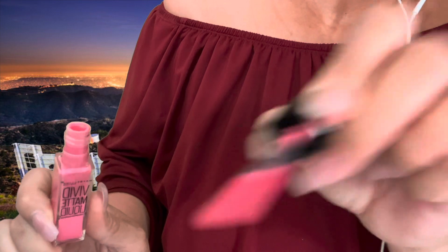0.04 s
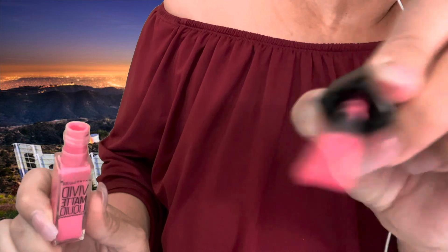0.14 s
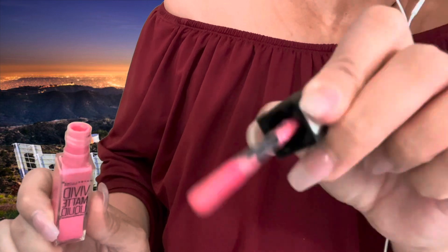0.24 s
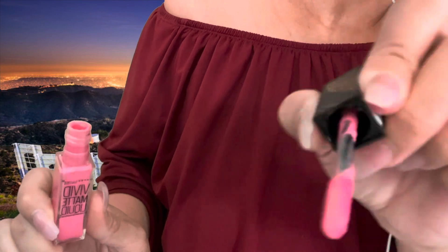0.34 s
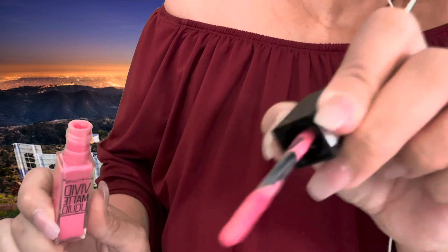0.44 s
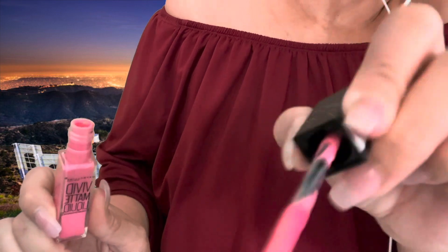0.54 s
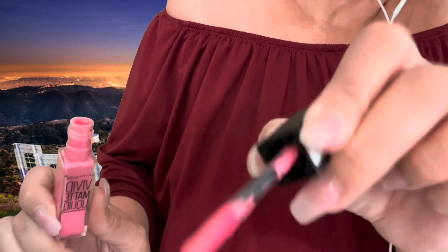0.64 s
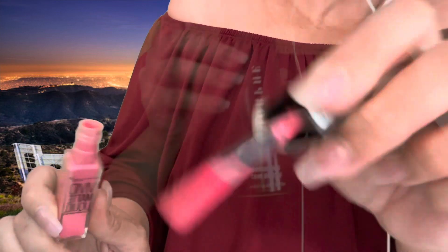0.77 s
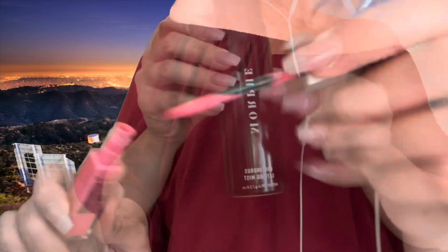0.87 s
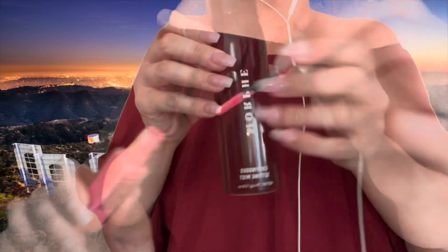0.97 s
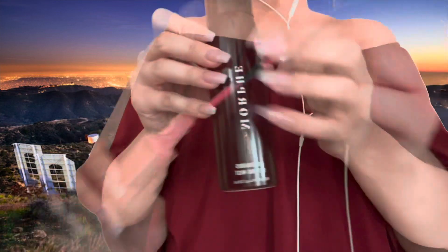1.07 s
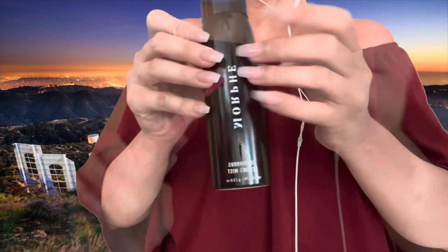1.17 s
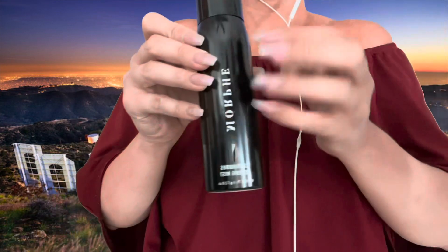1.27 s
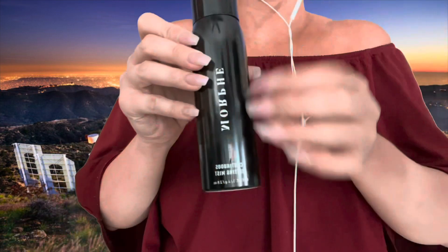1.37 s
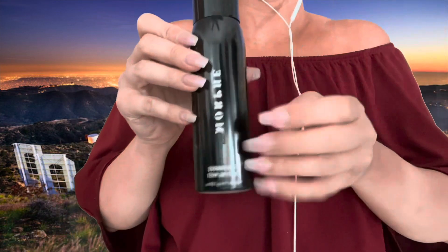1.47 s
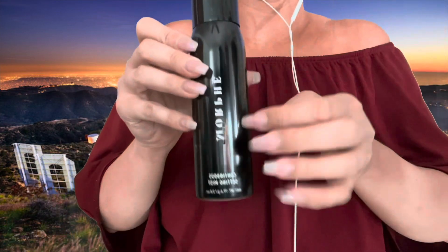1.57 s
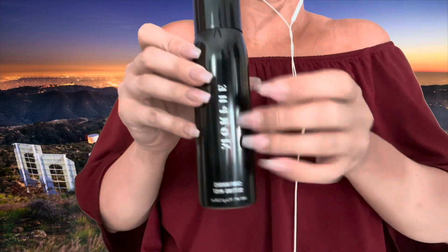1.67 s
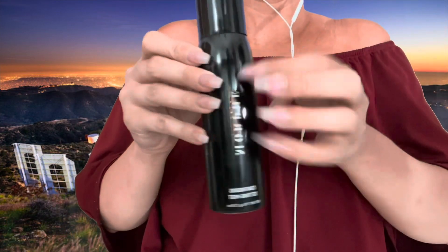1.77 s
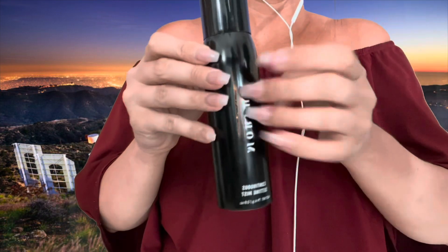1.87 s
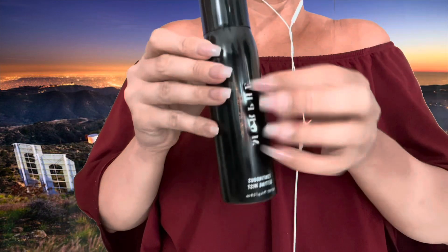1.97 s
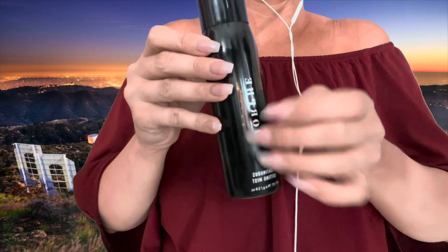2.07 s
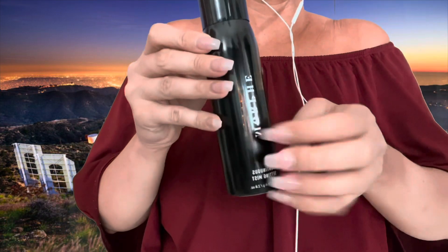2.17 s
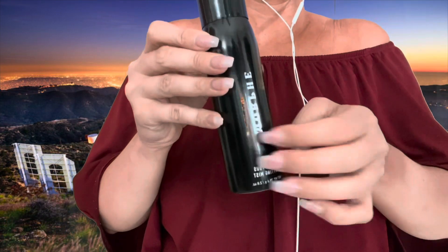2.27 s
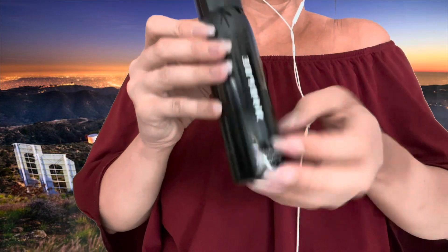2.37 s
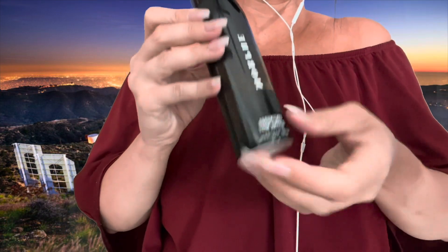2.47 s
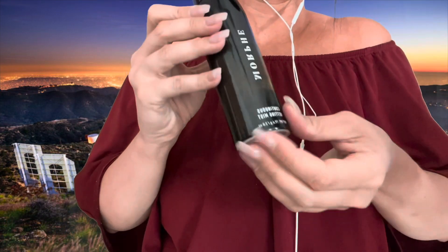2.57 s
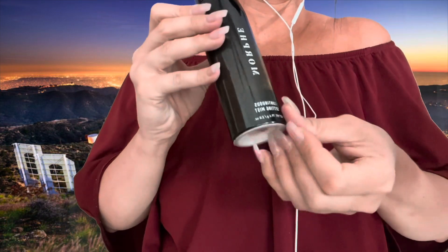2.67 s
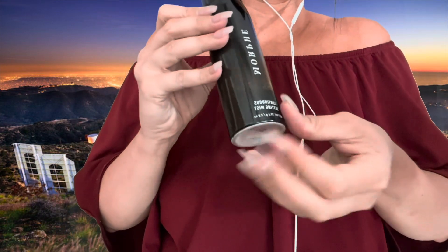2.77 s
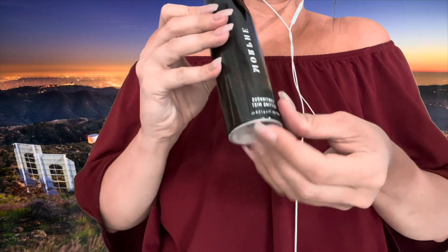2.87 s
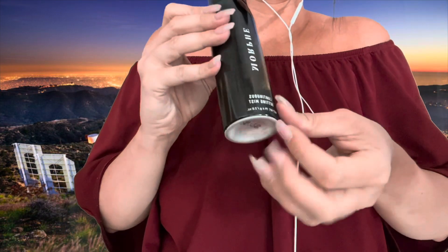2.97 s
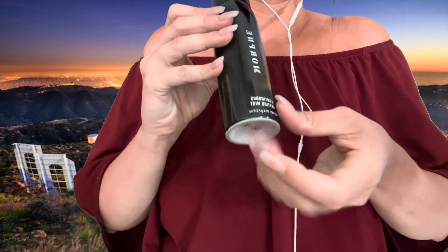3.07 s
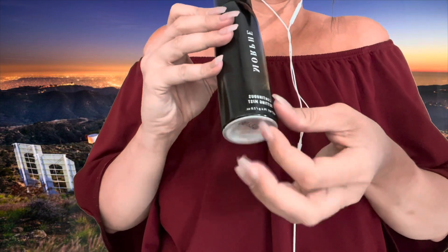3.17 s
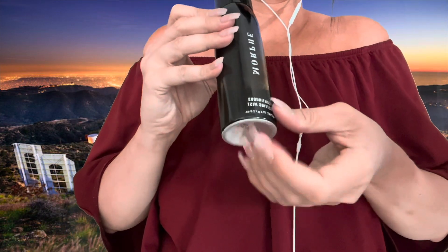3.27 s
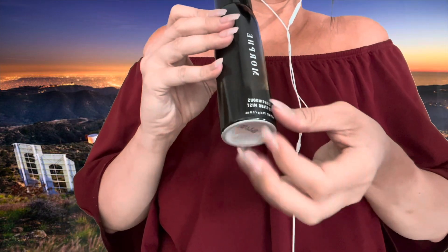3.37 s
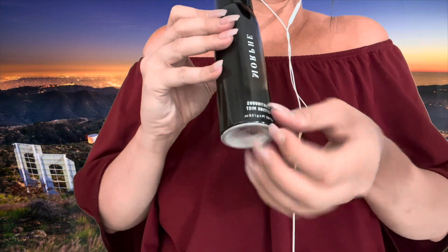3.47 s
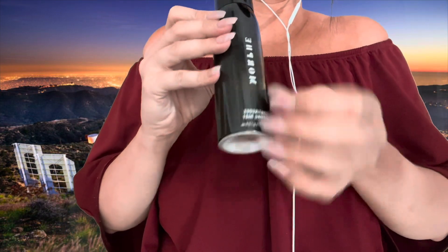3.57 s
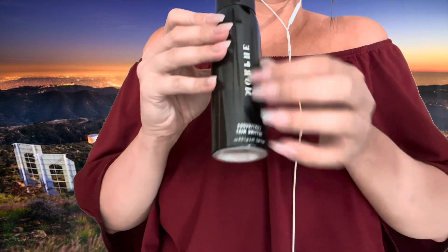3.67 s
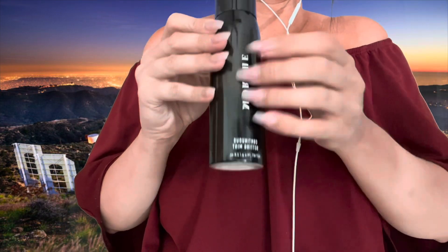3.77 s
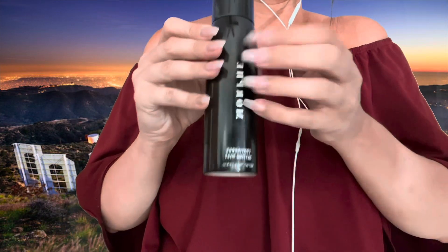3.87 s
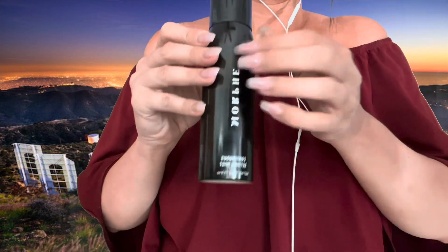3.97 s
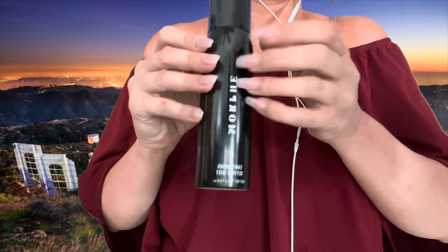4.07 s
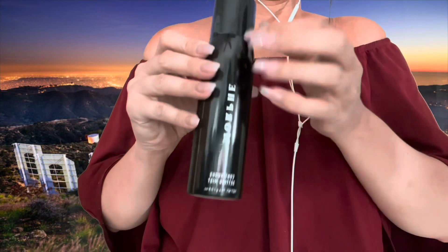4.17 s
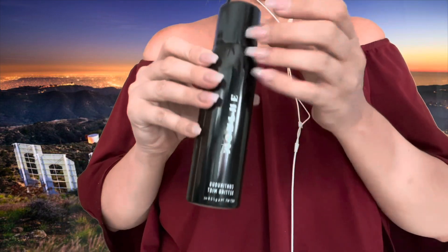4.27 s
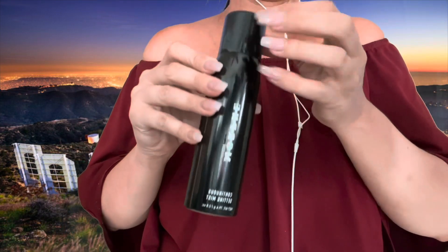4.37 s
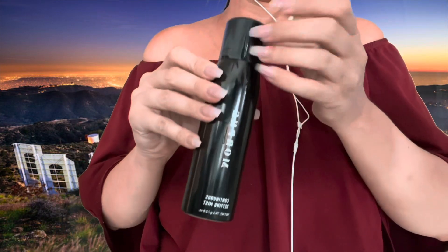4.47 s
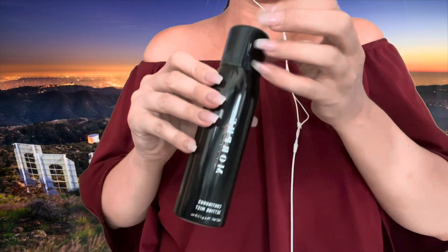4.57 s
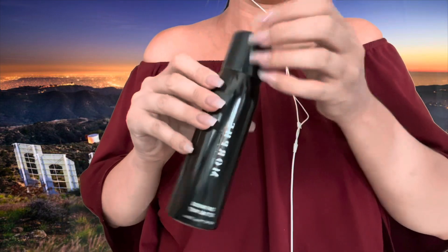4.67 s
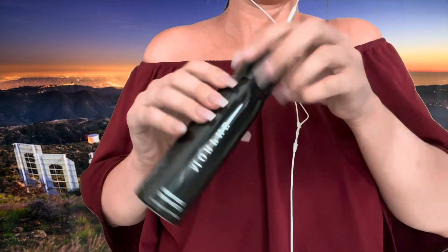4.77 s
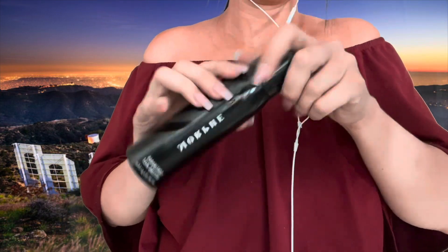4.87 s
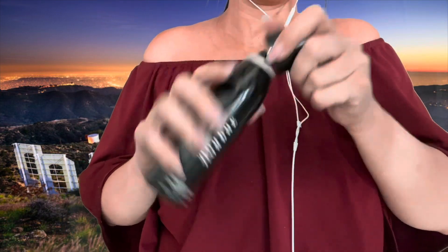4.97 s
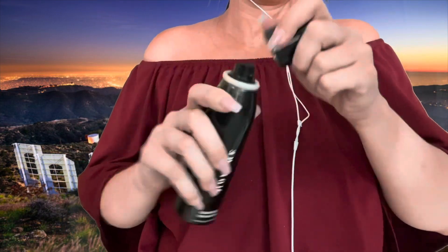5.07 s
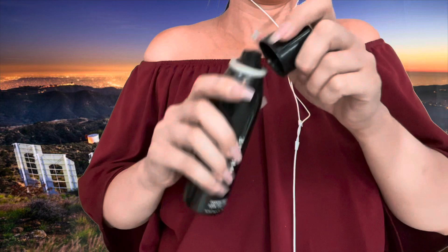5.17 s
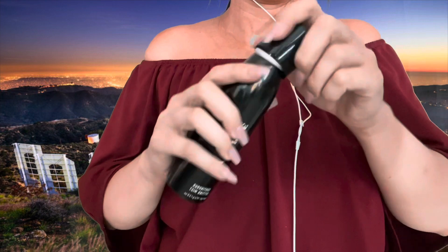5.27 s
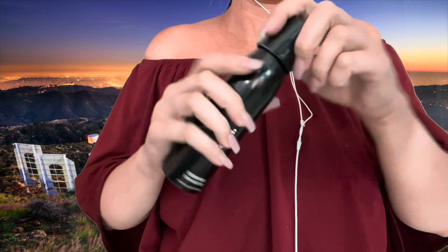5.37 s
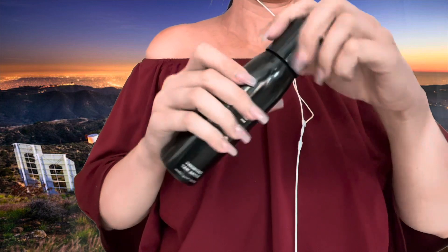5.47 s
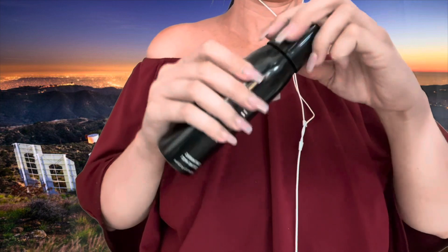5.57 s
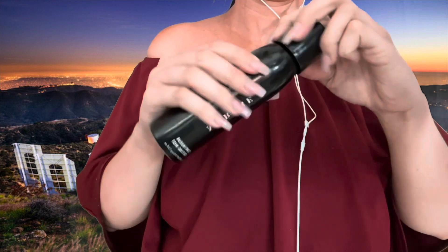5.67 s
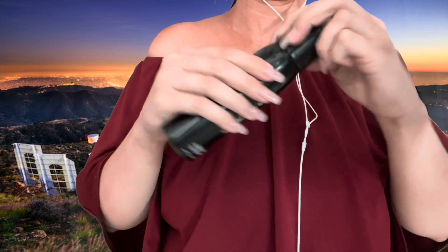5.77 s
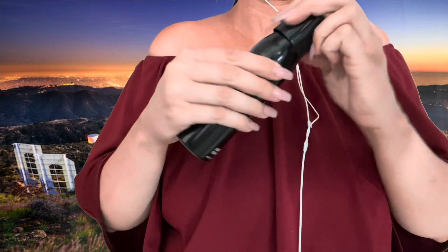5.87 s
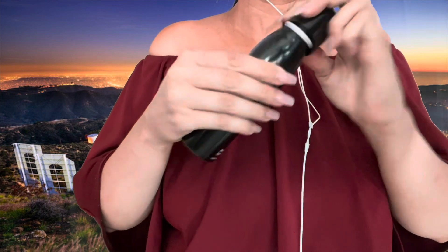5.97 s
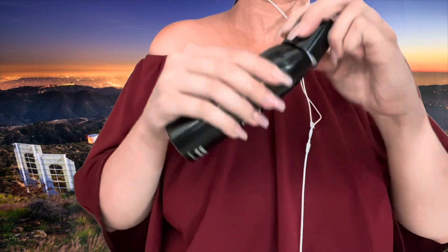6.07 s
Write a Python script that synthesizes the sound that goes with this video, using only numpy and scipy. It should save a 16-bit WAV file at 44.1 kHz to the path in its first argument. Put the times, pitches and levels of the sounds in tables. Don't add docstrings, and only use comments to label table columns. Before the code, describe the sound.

A quiet, small furnished room heard by a very close stereo microphone, with faint low hum, ventilation, distant machinery drones and light hiss. From 0 to 0.8 seconds a wand clicks in its plastic tube, clearest around 0.23, with hollow air pops near 0.5 and 0.77. Nail taps grow from faint to strong by 1.1, then run fast and loud until 2.3, about fifteen to twenty a second, bright, hard and briefly metallic, slightly right. From 2.4 to 3.6 they become softer and irregular on the can's base, with little scrapes. Strong wall taps return from 3.6 to 4.1; drier, duller plastic cap taps follow to 4.7. Skin rustles on the can, a pop at 4.93 loosens the cap, then quiet clicks, rubbing and hollow pops around 5.27 and 5.76 continue, with a busier cluster of clicks and rubs from 5.95 to the end.

```python
import sys
import numpy as np
from scipy import signal
from scipy.fft import rfft, irfft
from scipy.io import wavfile
from scipy.ndimage import uniform_filter1d

SR = 44100
rng = np.random.default_rng(int(sys.argv[2]) if len(sys.argv) > 2 else 0)


def natural_amplitude(level_db):
    exponent = np.asarray(level_db, float) / 20
    return 10 ** exponent


def waveform_to_disk(signal):
    frames = np.transpose(np.atleast_2d(signal))
    scaled = np.clip(frames, -1, 1) * 32767
    samples = np.round(scaled).astype(np.int16)
    wavfile.write(sys.argv[1], SR, samples)


N = 270333
CONTACT = 6144

# start_s, # peak_db, struck_spot_hz, weight_below_3khz_db, and in some rows edge_above_10khz_db
LOWER_WALL_TAPS = [
    (.788, -29.5, 10160, -32, -8),
    (.809, -22.5, 9500, -14, 0),
    (.844, -27, 9250, -6, 4),
    (.858, -17, 8660, -22, -4),
    (.925, -10.5, 5530, -19, -7),
    (.974, -13, 7600, -20, -4),
    (1.046, -5, 9500, -27.5, -3),
    (1.115, -9, 7340, -52.5, -0.5),
    (1.169, -4.5, 8230, -37, -3.5),
                   (1.241, -2.5, 4780, -21.5, -7.5), (1.301, 0, 7300, -19.5, -8.5),
             (1.332, -4.5, 5480, -14, -9.5), (1.415, -2.5, 6480, -11.5, -10.5),
             (1.472, -2.5, 6060, -18.5, -7.5), (1.488, -3.5, 5000, -17, -13), (1.508, -2, 8620, -6, -5),
             (1.565, 0, 4580, -10, -4), (1.635, 1.5, 8460, -17.5, -2.5), (1.657, -2, 5040, -10.5, -3.5),
             (1.683, -3, 7230, -14, -4), (1.742, -0.5, 8000, -24.5, -10), (1.815, -2, 7000, -39, -5),
             (1.851, -5, 7670, -16, -9), (1.896, -6, 7280, -19, -7), (1.941, -2, 8050, -28.5, -13),
             (2.012, -1.5, 8800, -25, -6), (2.049, -4, 8100, -16, -6), (2.075, -4, 8820, -16.5, -14),
             (2.13, -2.5, 5530, -17, -10), (2.192, -15, 8200, -10.5, -7), (2.221, -5.5, 8020, -48, -10),
             (2.25, -3.5, 8190, -20.5, -16), (2.301, -1.5, 5530, -19.5, -15.5)]
BASE_TAPS = [(2.399, -15, 5510, -15, -9), (2.424, -15.5, 6800, -19.5, 0), (2.444, -35, 3650, -8, -15),
             (2.504, -26, 4860, -16.5, -14), (2.588, -34.5, 4050, -12, -12), (2.615, -12, 6000, -20.5, -8),
             (2.628, -5.5, 6500, -21.5, -9), (2.823, -33.5, 6430, -13, -4), (2.864, -16, 5230, -14.5, -5),
             (2.874, -8, 9900, -18, -16), (2.893, -19, 6500, -15, 2), (3.032, -12, 6780, -47, -0.5),
             (3.12, -17, 9800, -18.5, -3), (3.166, -6.5, 6990, -24, -2.5), (3.231, -20.5, 9680, -13, -3),
             (3.257, -9.5, 6800, -22, -6.5), (3.287, -10.5, 9530, -15, -19), (3.329, -4.5, 7050, -44, -1.5),
             (3.388, -19, 9700, -13.5, 1), (3.433, -13.5, 9400, -20, -15), (3.449, -10, 9680, -22.5, -24),
             (3.481, -10, 6760, -21, -8), (3.6053, -2, 6320, -22, 1.5)]
UPPER_WALL_TAPS = [(3.652, -9.5, 5400, -1.5, -9), (3.662, -1, 6100, -13.5, -13.5),
                   (3.735, -4.5, 8000, -40, -2), (3.754, -5, 6200, -15, -5),
                   (3.7715, -3.5, 7600, -11.5, -8), (3.804, -15, 5540, -6, -12),
                   (3.8275, -1.5, 7600, -19, -8), (3.869, -5.5, 7800, -22.5, -3),
                   (3.925, -5.5, 7550, -12, -1), (3.949, -5, 5530, -14.5, -6),
                   (3.996, 0.5, 7550, -21, -2.5), (4.033, -22, 3400, 9, -11),
                   (4.052, -0.5, 8150, -25, -3.5), (4.082, -5, 8460, -18, -4), (4.111, -6, 7700, -17, -4)]
CAP_TAPS = [(4.19, -13, 3770, -15.5, -9), (4.244, -2, 5980, -38, -18), (4.271, -8, 9400, -18.5, -2.5),
            (4.306, -12.5, 3720, -18.5, -8), (4.352, -5.5, 3494, -20.5, -30), (4.386, -31, 6000, -8, -9),
            (4.425, -6.5, 9330, -27, 1.5), (4.466, -12, 3830, -13.5, -4), (4.492, -12.5, 6970, -12.5, -3.5),
            (4.601, -8.5, 4390, -16, -7), (4.632, -13, 6940, -17.5, -9), (4.668, -12, 4900, -14.5, -7.5),
            (4.77, -36, 4370, -36, -26), (4.811, -24, 3540, -11, -24), (4.815, -22.5, 4050, -13, -26)]
CAP_CLICKS = [(4.903, -33, 2430, -1), (4.982, -34, 2020, -29), (5.019, -33.5, 2430, -10),
              (5.062, -39.5, 2370, -9), (5.086, -35, 6920, -55), (5.154, -50, 2000, 3),
              (5.2, -33, 7050, -9.5), (5.322, -18.5, 3640, -2), (5.417, -33.5, 4950, -4),
              (5.469, -15.5, 7420, -17.5), (5.563, -39, 1990, 6), (5.694, -44.5, 2464, 3),
              (5.782, -28, 3600, 3), (5.872, -39, 5170, -4), (5.9475, -27, 2530, 12),
              (5.951, -27, 1500, 8.5), (5.979, -27, 2620, -1, 8), (5.9855, -25, 5530, -14, 8),
              (6, -34, 2300, 9), (6.03, -39, 5800, 0), (6.049, -32, 2030, 5), (6.0705, -20.5, 2050, 2),
              (6.094, -33, 2300, 7), (6.101, -23, 2380, 8), (6.1185, -24, 2520, 3)]
WAND_CLICKS = [(.0135, -42, 3900, -4), (.2155, -40, 9000, -24), (.07, -28, 10960, -37),
               (.0895, -18.5, 4030, -24), (.0985, -18, 9400, -46), (.2225, -37, 5800, -27),
               (.2288, -10.5, 3140, -37), (.2352, -14, 1500, -9), (.2391, -15, 1930, -1),
               (.2635, -36, 2230, -6), (.2821, -32, 8300, -24), (.3571, -46.5, 3500, -14),
               (.412, -52, 3080, -3), (.485, -52, 2480, -3), (.004, -35, 8000, -9)]
# pitch_hz, level_db, t60_s
WALL_MODES = [(2600, 13.5, 0.0089), (4170, -17, 0.049), (5308, 2.5, 0.042), (5530, 0.5, 0.017),
              (6150, 1, 0.027), (7600, 4, 0.024), (8130, 4, 0.025), (8637, 4, 0.011), (9510, 1.5, 0.051),
              (11660, -14.5, 0.03)]
BASE_MODES = [(2514, -2.5, 0.022), (4546, 4.5, 0.0063), (5880, -6, 0.042), (6603, 4, 0.0076),
              (9680, -5.5, 0.032), (12870, 4.5, 0.054)]
CAP_MODES = [(1500, -2, 0.007), (2403, 10.5, 0.0048), (3710, -1.5, 0.0055), (6500, -52, 0.0058),
             (8230, -4, 0.0046), (13340, 29.5, 0.0023)]
# pitch_hz, width_hz, level_under_tap_db, t60_s
WALL_RING = [(2430, 140, -40, 0.19), (9370, 430, -61, 0.15), (8000, 4100, -31, 0.087)]
BASE_RING = [(6700, 1300, -30, 0.097), (9680, 420, -45, 0.18), (12950, 230, -39, 0.2)]
CAP_RING = [(2430, 210, -28.5, 0.1)]
# time_s, left_over_right_db
HAND = [(.2, -5), (1.1, -4.5), (1.45, -7), (1.65, -5), (1.95, -2), (2.2, -4.5), (3.5, -4.5), (4, -4.5),
        (4.2, -5), (5.5, -4)]
# start_s, peak_db, cavity_hz, upper_mode_db,
# t60_s
POPS = [(.014, -46, 3950, -6, .03), (.264, -45, 2230, -20, .03), (0.5169, -26.5, 1222, 7, 0.043),
        (0.7609, -30.5, 1290, -20, 0.032), (0.7694, -19.5, 1182, -20, 0.017),
        (4.9319, -21.5, 1018, -1, .06), (5.235, -43, 1500, 0, 0.022), (5.256, -26, 1530, -24, 0.022),
        (5.278, -21, 1414, -12, 0.019), (5.418, -36.5, 1170, 0, 0.031), (5.518, -45, 1110, -3, .025),
        (5.578, -41.5, 1100, -7, 0.037), (5.647, -50.5, 1055, 3, 0.049), (5.734, -47, 1030, -1, .03),
        (5.757, -23.5, 1090, -3, 0.025), (5.781, -44, 970, 1, .03), (5.952, -41, 1280, -23, 0.022),
        (6.04, -44, 1480, -1, 0.022)]
# start_s, peak_db, pitch_hz
THUMPS = [(.001, -34, 450), (5.2, -38, 500), (0.902, -23.5, 474), (1.473, -25.5, 300), (1.566, -22.5, 355),
          (2.192, -32.5, 241), (2.397, -28, 383), (2.626, -26.5, 614), (2.874, -23.5, 353),
          (3.287, -23, 386), (3.482, -24, 328), (4.05, -30, 340), (4.244, -26.5, 295)]
# start_s, peak_db, pitch_hz, t60_s
STAND_BUMP = (.988, -24, 112, .12)
# firmest_grip_s, build_up_s, cavity_db, scrape_db, cavity_hz
RUB = [(4.924, .02, -42, -50, 1000), (4.91, .008, -48, -60, 2400), (5.03, .012, -50, -65, 2400),
       (5.953, .005, -44, -65, 2500), (2.45, .01, -65, -46, 990), (2.639, .005, -53, -34.5, 1000),
       (2.766, 0.018, -65, -46, 1000), (2.95, .03, -71, -44.5, 1000), (4.822, .01, -61.5, -42.5, 1005),
       (5.972, .02, -38.5, -49.5, 1095), (6.098, .015, -43, -42, 1250), (2.905, .005, -63, -34, 1060),
       (4.944, 0.0037, -31, -47, 1060), (5.41, 0.048, -42, -50.5, 1250), (5.444, 0.05, -48.5, -60, 1100),
       (5.492, .01, -45, -38.5, 1500), (5.52, 0.064, -42.5, -60, 1080), (5.579, 0.06, -51, -81, 1010),
       (5.658, 0.052, -62, -75.5, 1080), (5.774, 0.045, -35, -43, 1140), (5.81, 0.018, -42.5, -59, 930),
       (5.855, 0.024, -55, -64, 880), (5.95, 0.0048, -36.5, -46, 1186), (5.99, 0.046, -53, -61, 1120),
       (6.035, .03, -42, -72, 1500), (6.08, 0.022, -41, -58, 1270), (6.124, 0.067, -43, -64, 1110)]
# time_s, level_db
RUSTLE = [(4.7, -67), (4.818, -52.5), (5.166, -56.5), (5.26, -46), (5.388, -71), (5.524, -75), (5.806, -76),
          (5.934, -75), (6.13, -64)]
# pitch_hz, t60_s
ROOM_T60 = [(300, 0.38), (1100, 0.13), (2000, 0.11), (6000, 0.27), (11000, 0.14), (15000, 0.081)]
# pitch_hz, level_db
VENT = [(21, -47), (36, -11), (59, -4.5), (92, -9), (125, -3.5), (392, -13.5), (557, -24), (694, -27),
        (767, -21), (923, -23), (1170, -27), (2000, -31), (2600, -55), (4400, -120)]
# pitch_hz, width_hz, level_db
HUM = [(41.06, 3.4, -48), (175, 14, -57.5), (239.7, 6.3, -59)]
# time_s, level_db
DRONE = [(1.0, -53), (2.2, -50), (2.5, -54.5), (3.04, -43.5), (3.38, -53)]
# time_s, level_db
RUMBLE = [(.85, -54.5), (1.1, -50), (1.6, -41), (2.3, -59.5)]
# time_s, level_db
SWAY = [(0, -40.5), (.78, -36.5), (.95, -59), (1.4, -72.5), (5.75, -64.5), (6.13, -40.5)]
# start_s, end_s, start_pitch_hz, end_pitch_hz, level_db
FAR_TONES = [
    (0.857, 1.504, 172, 179.5, -45.5),
    (1.15, 1.95, 142.5, 150.7, -52),
    (1.697, 2.148, 180, 193, -53),
    (2.048, 2.274, 233, 236, -46),
    (2.212, 3.267, 101.3, 104.6, -42.5),
    (2.95, 3.253, 179.4, 174, -53),
]
# pitch_hz, level_db
HISS = [(880, -35), (1500, -33.5), (1990, -36), (2110, -1), (4050, -12), (13000, -18), (15200, -17),
        (16500, -33.5)]
# time_s, hiss_gain_db
HISS_RISE = [(.75, 4.5), (1.1, 7)]


def at_hz(points, hz):
    table = np.array(points)
    return np.interp(np.log(hz), np.log(table[:, 0]), table[:, 1])


def in_time(rows):
    s, value = np.transpose(rows)
    return np.interp(np.arange(N) / SR, s, value)


def rms_one(x):
    return x / np.sqrt(np.mean(x ** 2) + 1e-20)


def band(x, low_hz, high_hz, order=2):
    edges = [low_hz, min(high_hz, .45 * SR)]
    return signal.sosfilt(signal.butter(order, edges, "band", fs=SR, output="sos"), x)


def stereo_noise(alike):
    mid, side = rng.standard_normal((2, N))
    return np.sqrt(1 + alike) * mid + np.sqrt(1 - alike) * side * [[1], [-1]]


def coloured(x, spectrum):
    hz = np.maximum(np.fft.rfftfreq(N, 1 / SR), 5)
    return rms_one(irfft(rfft(x) * natural_amplitude(at_hz(spectrum, hz)), N))


def fade(t60):
    return natural_amplitude(-60 * np.arange(CONTACT) / SR / np.reshape(t60, (-1, 1)))


def add(out, s, sound, pan_db):
    i = round(s * SR)
    placed = sound * natural_amplitude([[pan_db / 2], [-pan_db / 2], [0]])
    out[:, i:i + CONTACT] += placed[:, :N - i]


def taps(events, body, ring, crack_db, crack_t60, spot_db, low_db, edge_db, unlike, round_db):
    scatter_db, detune = 3.5, .012
    longest_t60 = .015
    hz, level_db, t60 = np.transpose(body)
    t, out = np.arange(CONTACT) / SR, np.zeros((3, N))
    landing = 1. * (np.arange(CONTACT) == 44)
    all_round = natural_amplitude(round_db) * band(landing, 1400, 20000)
    tick = band(landing, 650, 17000, order=1)
    sides = np.array([[1], [-1]]) * unlike
    bite = np.clip(t / 0.00103, 0, 1) ** 14
    for s, peak_db, spot_hz, chest_db, *edge in events:
        place, face, turn = rng.standard_normal((3, len(hz)))
        white = rng.standard_normal((2, CONTACT))
        white = white[0] + sides * white[1]
        mode_hz = hz * (1 + detune * turn[::-1])
        rings = fade(np.minimum(t60, longest_t60)) * np.exp(2j * np.pi * np.outer(mode_hz, t))
        strength = natural_amplitude(level_db + scatter_db * (place + sides * face)) * np.exp(1j * sides * turn)
        modes = (strength @ rings).imag
        spot_fade = fade(min(0.94 * crack_t60, longest_t60))
        spot = natural_amplitude(spot_db) * np.sin(2 * np.pi * spot_hz * t) * spot_fade
        crack = natural_amplitude(crack_db) * white * fade(crack_t60)
        pair = bite * (modes + spot + crack)

        top_db = edge_db + sum(edge)
        shares = [(500, 1800, chest_db + low_db), (1800, 3300, chest_db), (3500, 10500, 0),
                  (10500, 14500, top_db), (14500, 17500, top_db - 6)]
        struck = 0
        for low_hz, high_hz, share_db in shares:
            part = band(pair, low_hz, high_hz, order=4)
            struck = struck + natural_amplitude(share_db) * part / np.abs(part.mean(axis=0)).max()
        struck = struck / np.abs(struck.mean(axis=0)).max()
        struck = struck + natural_amplitude(-3) * tick * np.sign(place[0])

        for (ring_hz, width, ring_db, ring_t60), luck in zip(ring, place):
            ring_hz = ring_hz * (1 + detune * luck / 2)
            ring_db = ring_db + scatter_db * luck
            cluster = band(white, ring_hz - width / 2, ring_hz + width / 2, order=1)
            struck = struck + natural_amplitude(ring_db) * bite * rms_one(cluster) * fade(ring_t60)
        to_room = 0.18 * struck.mean(axis=0) + all_round
        pan_db = np.interp(s, *np.transpose(HAND))
        add(out, s, natural_amplitude(peak_db + 2.5) * np.vstack([struck, to_room]), pan_db)
    return out


def pops(pan_db):
    t, out = np.arange(CONTACT) / SR, np.zeros((3, N))
    bite = np.clip(t / 0.0008, 0, 1)
    for s, peak_db, hz, upper_db, t60 in POPS:
        turn = 2 * np.pi * hz * t
        cavity = (np.sin(turn) + 0.31 * np.sin(1.06 * turn)) * fade(t60)[0]
        upper = natural_amplitude(upper_db) * np.sin(1.31 * turn) * fade(0.015)[0]
        push_level = natural_amplitude(11.5 + 0.4 * (peak_db + 24)) * (1100 / hz) ** 7
        push = push_level * np.sin(1.2 * turn) * fade(0.0043)[0]
        snap = natural_amplitude(-12) * band(rng.standard_normal((3, CONTACT)) * fade(0.0092), 2700, 8700)
        add(out, s, -natural_amplitude(peak_db + 8.5) * bite * (cavity + upper + push + snap), pan_db)
    return out


def thumps(pan_db):
    t, out = np.arange(CONTACT) / SR, np.zeros((3, N))
    for s, peak_db, hz in THUMPS:
        add(out, s, natural_amplitude(peak_db + 8.0) * np.sin(2 * np.pi * hz * t) * fade(2.0 / hz), pan_db)
    s, peak_db, hz, t60 = STAND_BUMP
    swing = np.clip(t / 0.0065, 0, 1) * np.sin(2 * np.pi * hz * t) * fade(t60)
    add(out, s, natural_amplitude(peak_db) * swing, pan_db / 2)
    return out


def rub(grains_per_s, spread_db):
    t, out = np.arange(N) / SR, 0
    slips = rng.random(N) < grains_per_s / SR
    sizes = natural_amplitude(spread_db * np.minimum(rng.exponential(1, N), 3))
    grains = slips * sizes * rng.choice([-1, 1], N)
    upper = 0.25 * band(grains, 1430, 2700)
    smooth = 0.54 * rng.standard_normal(N)
    scrape = rms_one(band(grains + smooth, 2000, 6500, order=1))
    for s, build_s, cavity_db, scrape_db, hz in RUB:
        cavity = rms_one(band(grains, 0.885 * hz, 1.1 * hz) + upper)
        build_up_db, let_go_db = 21 * (t - s) / build_s, 262 * (s - t)
        grip = natural_amplitude(np.minimum(build_up_db, let_go_db))
        out = out + grip * (natural_amplitude(cavity_db - 1.0) * cavity + natural_amplitude(scrape_db - 6) * scrape)
    return out * natural_amplitude([[-1.5], [1.5], [-3]])


def rustle(grains_per_s, flutter_db):
    t = np.arange(N) / SR
    flutter = rms_one(band(rng.standard_normal(N), 12, 60, order=1))
    grains = stereo_noise(0.53) * (rng.random(N) < grains_per_s / SR)
    level = natural_amplitude(in_time(RUSTLE) - 6.5 + flutter_db * flutter)
    return level * rms_one(band(grains, 2900, 16000, order=1)) * (t > RUSTLE[0][0])


def room(x):
    tail_db, echo_s, echo_db = -8.5, .0135, -18
    length = int(.4 * SR)
    t, tail, white = np.arange(length) / SR, 0, rng.standard_normal((2, 2, length))
    edges = 250 * 2 ** np.arange(0, 6.6, .5)
    for k, (low, high) in enumerate(zip(edges, edges[1:])):
        decay = natural_amplitude(-60 * t / at_hz(ROOM_T60, np.sqrt(low * high)))
        tail = tail + band(white[k % 2], low, high) * decay
    tail = tail * np.clip((t - .003) / 0.0069, 0, 1)
    tail = natural_amplitude(tail_db) * tail / np.sqrt(np.sum(tail ** 2) / 2)
    slap = white[0] * (t > echo_s) * natural_amplitude(-60 * (t - echo_s) / .016)
    slap = band(slap, 3200, 8200, order=1)
    tail = tail + natural_amplitude(echo_db) * slap / np.sqrt(np.sum(slap ** 2) / 2)
    return signal.fftconvolve(x[None], tail, axes=1)[:, :N]


def far_tones():
    t, out = np.arange(N) / SR, 0
    for start, end, from_hz, to_hz, level_db in FAR_TONES:
        along = np.clip((t - start) / (end - start), 0, 1)
        phase = 2 * np.pi * np.cumsum(from_hz + (to_hz - from_hz) * along) / SR
        swell = np.sqrt(np.sin(np.pi * along) + 1e-9)
        out = out + natural_amplitude(level_db + 2.5) * swell * np.sin(phase + np.array([[0], [.6]]))
    return out


def background():
    air = stereo_noise(0.82)
    hum = 0
    for hz, width, level_db in HUM:
        hum = hum + natural_amplitude(level_db) * rms_one(band(air, hz - width / 2, hz + width / 2))
    mains_phase = 2 * np.pi * 57.5 * np.arange(N) / SR
    mains = natural_amplitude(-46) * np.sin(mains_phase + np.array([[0], [.5]]))
    vent = natural_amplitude(-47) * coloured(stereo_noise(0.63), VENT) * natural_amplitude([[-1], [1.2]])
    drone = natural_amplitude(in_time(DRONE)) * rms_one(band(stereo_noise(1.0), 99.4, 108.0))
    rumble = natural_amplitude(in_time(RUMBLE)) * rms_one(band(stereo_noise(0.31), 106, 188.0)) * natural_amplitude([[-1.4], [1.4]])
    sway = natural_amplitude(in_time(SWAY)) * rms_one(band(stereo_noise(0.3), 21, 30.3)) * natural_amplitude([[1.5], [-1.5]])
    hiss = natural_amplitude(-70 + in_time(HISS_RISE)) * coloured(stereo_noise(0.06), HISS)
    return hum + mains + vent + drone + rumble + sway + far_tones() + hiss


def thinned(x):
    recovery_db, saving_db = 3, 8
    scatter_db, quietest_db = 7, -55
    z = signal.stft(x, SR, nperseg=256, noverlap=192)[2]
    frames = z.shape[2] // 4 * 4
    power = (np.abs(z[:, :126, :frames]) ** 2).sum(axis=0)
    cell_db = 10 * np.log10(power.reshape(21, 6, -1, 4).mean(axis=(1, 3)) + 1e-14)
    ramp = recovery_db * np.arange(cell_db.shape[1])
    recent_db = np.maximum.accumulate(cell_db[2:].max(axis=0) + ramp) - ramp
    for step in (1, 2):
        recent_db = np.maximum(recent_db, np.roll(recent_db, -1) - saving_db)
    luck = rms_one(uniform_filter1d(rng.standard_normal(cell_db.shape), size=2))
    margin_db = np.linspace(31, 17, len(cell_db))[:, None] + scatter_db * luck
    lowest = (np.arange(len(cell_db)) < 3)[:, None]
    keep = (cell_db > recent_db - margin_db) | (recent_db < quietest_db) | lowest
    keep |= cell_db > np.roll(cell_db, 1, axis=1) + 7
    z[:, :126, :frames] *= np.repeat(np.repeat(keep, 6, axis=0), 4, axis=1)
    return signal.istft(z, SR, nperseg=256, noverlap=192)[1][:, :N]


def scene():
    hands = taps(LOWER_WALL_TAPS, WALL_MODES, WALL_RING, crack_db=11.5, crack_t60=0.011,
                 spot_db=10.5, low_db=-13.0, edge_db=-2.2, unlike=0.44, round_db=6.0)
    hands += taps(BASE_TAPS, BASE_MODES, BASE_RING, crack_db=7.0, crack_t60=0.0075,
                  spot_db=12.5, low_db=-0.5, edge_db=-5.0, unlike=0.42, round_db=2.0)
    hands += taps(UPPER_WALL_TAPS, WALL_MODES, WALL_RING, crack_db=13.0, crack_t60=0.0091,
                  spot_db=7.5, low_db=-21.0, edge_db=-3.1, unlike=0.2, round_db=4.0)
    hands += taps(CAP_TAPS, CAP_MODES, [], crack_db=1.0, crack_t60=0.011,
                  spot_db=-2.5, low_db=-5.0, edge_db=0.0, unlike=0.24, round_db=6.5)
    hands += taps(CAP_CLICKS, CAP_MODES, CAP_RING, crack_db=4.5, crack_t60=0.017,
                  spot_db=-0.5, low_db=2.5, edge_db=-9.5, unlike=0.4, round_db=3.0)
    hands += taps(WAND_CLICKS, CAP_MODES, [], crack_db=6.0, crack_t60=0.0029,
                  spot_db=15.0, low_db=5.5, edge_db=-38.5, unlike=0.29, round_db=-29)
    soft = pops(pan_db=-5.0) + thumps(pan_db=-5.0)
    hands += soft * natural_amplitude([[0], [0], [-8]])
    hands += rub(grains_per_s=550, spread_db=0.5)
    left = np.convolve(hands[0], [-1 / 16, 9 / 16, 9 / 16, -1 / 16])[2:N + 2]
    near = np.array([left, hands[1]])
    return near + room(hands[2]) + background() + rustle(grains_per_s=6000, flutter_db=-1.0)


def top_cut(x):
    return signal.sosfilt(signal.butter(12, 16840, fs=SR, output="sos"), x)


def record(dry):
    cut = signal.cheby2(10, 60, 16800, fs=SR, output="sos")
    overloaded = np.clip(dry, -1, 1)
    mix = np.clip(thinned(signal.sosfilt(cut, overloaded)), -1, 1)
    return top_cut(mix)


dry = scene()
out = record(dry)
waveform_to_disk(out)
```